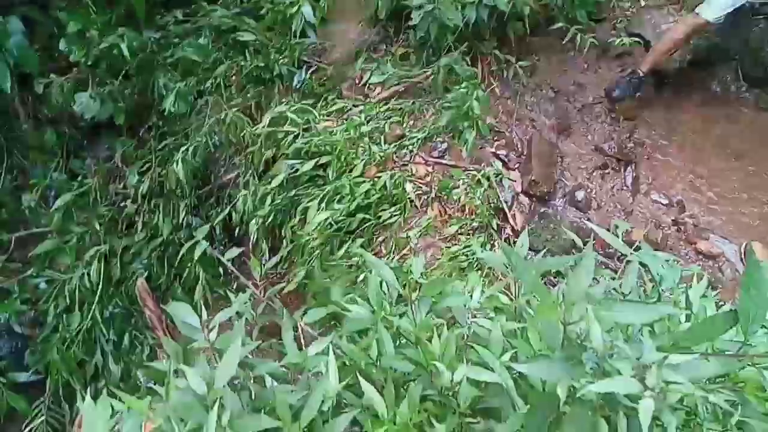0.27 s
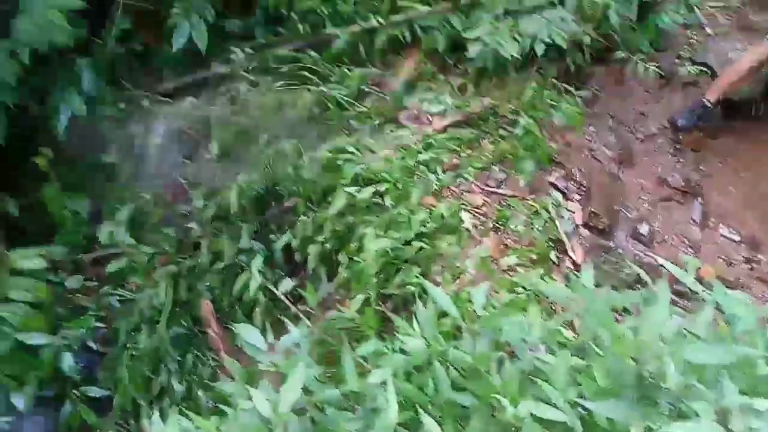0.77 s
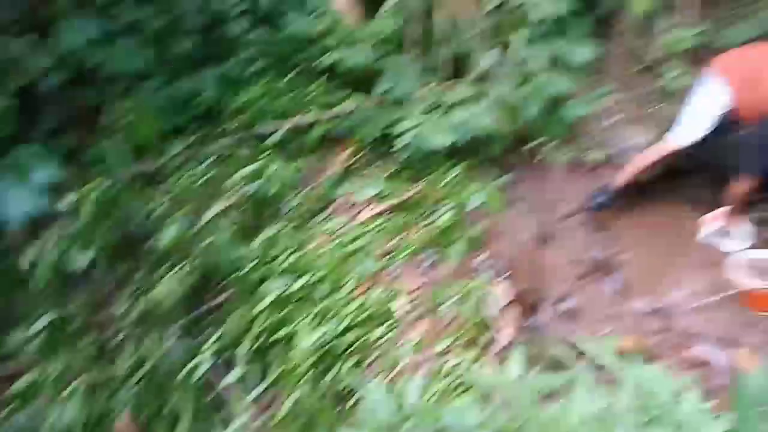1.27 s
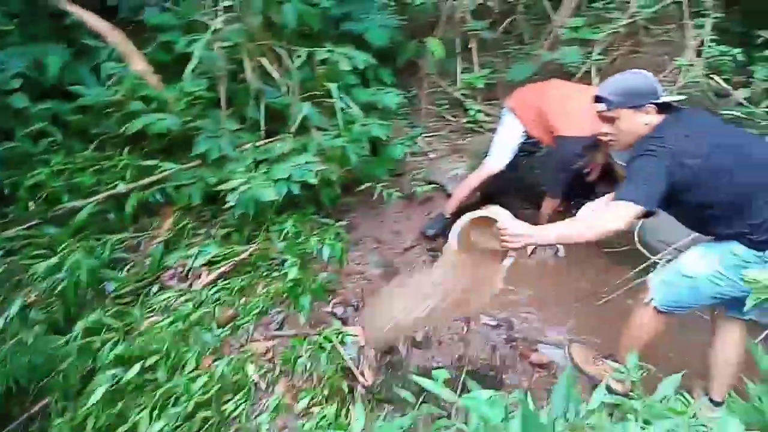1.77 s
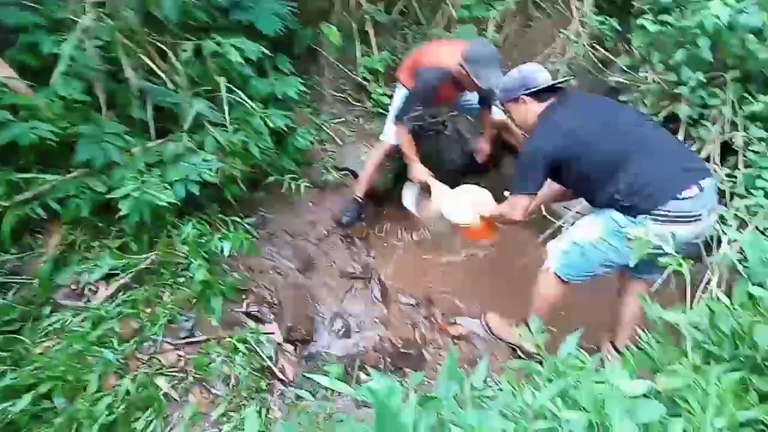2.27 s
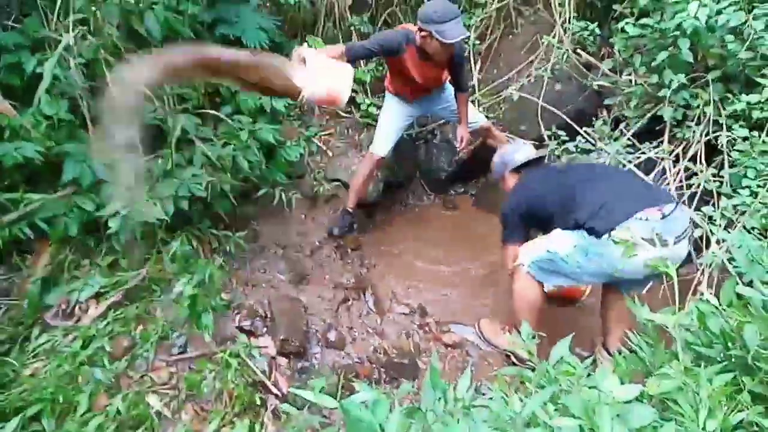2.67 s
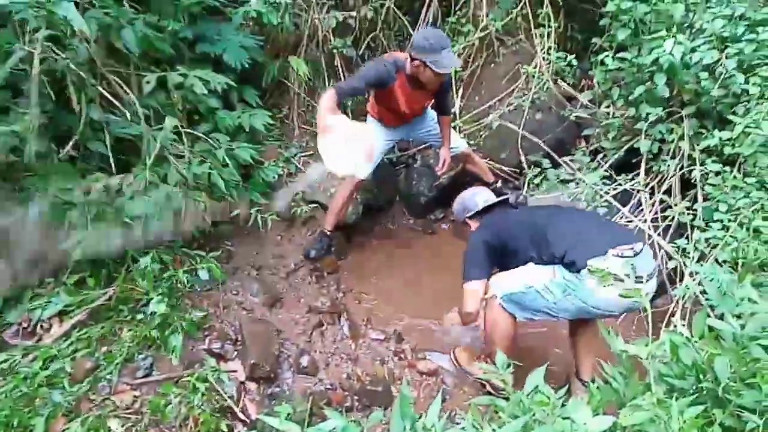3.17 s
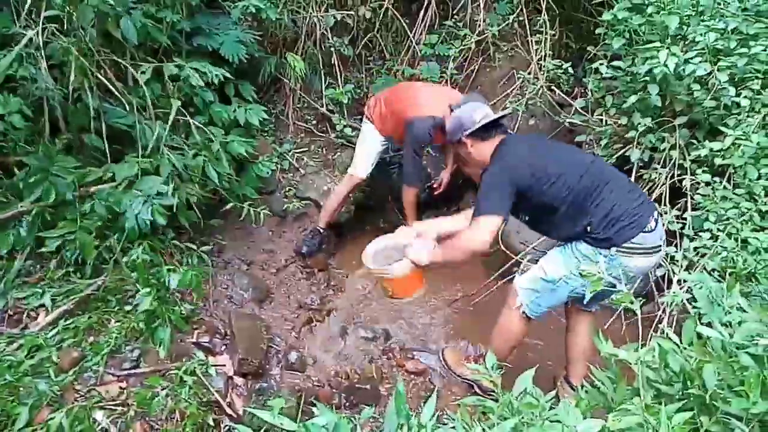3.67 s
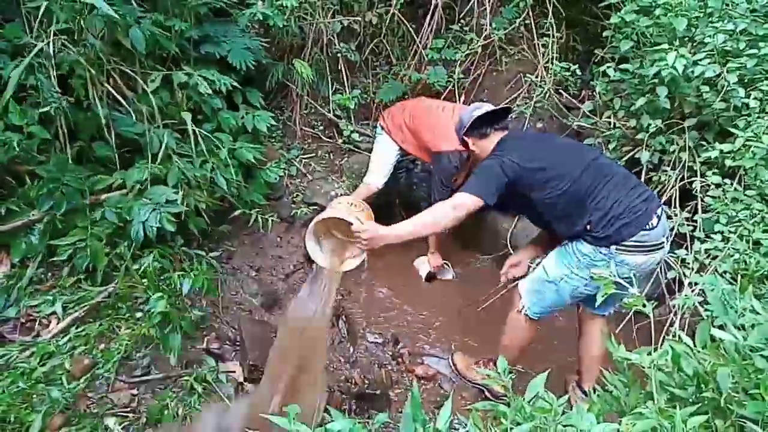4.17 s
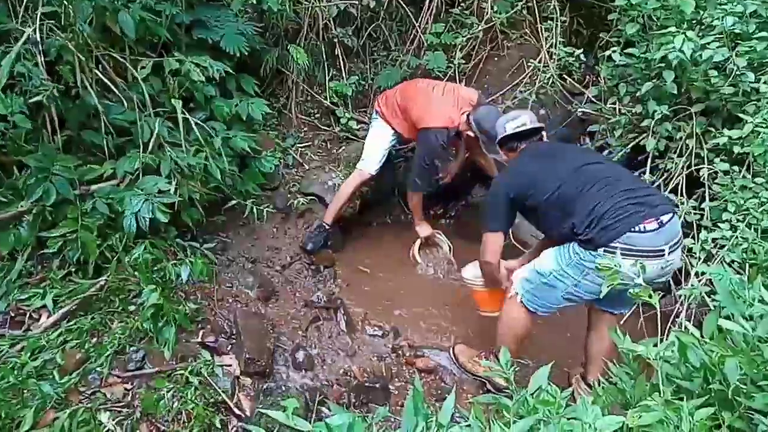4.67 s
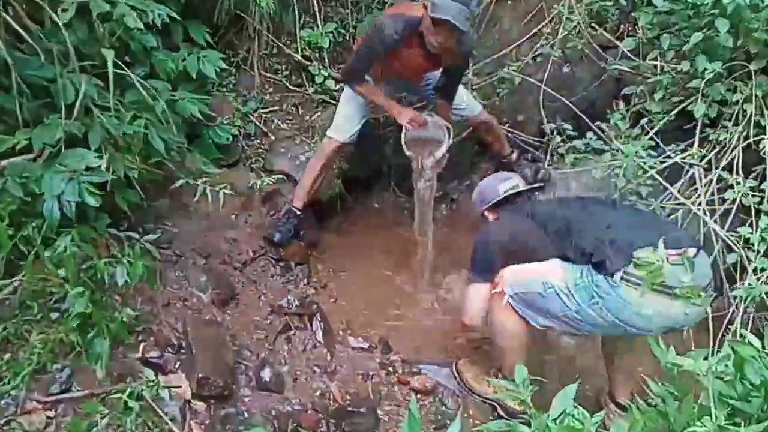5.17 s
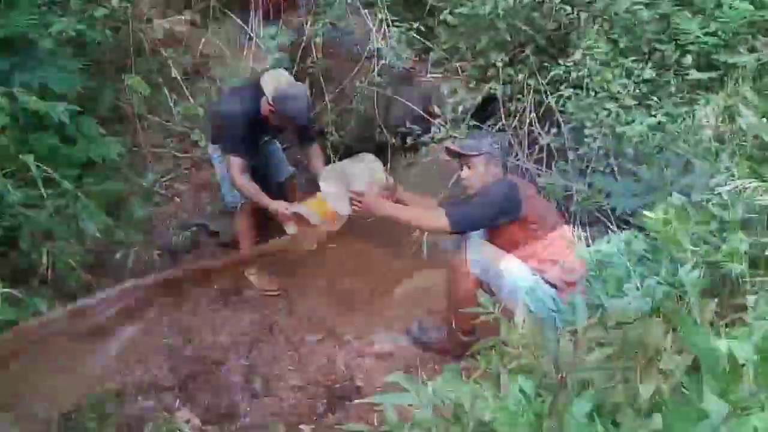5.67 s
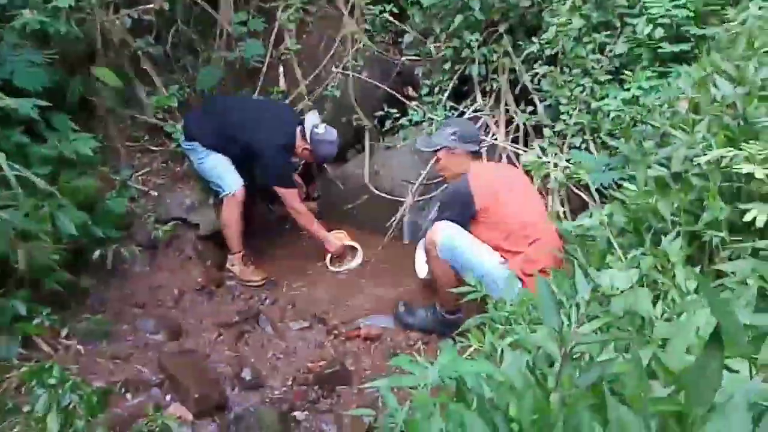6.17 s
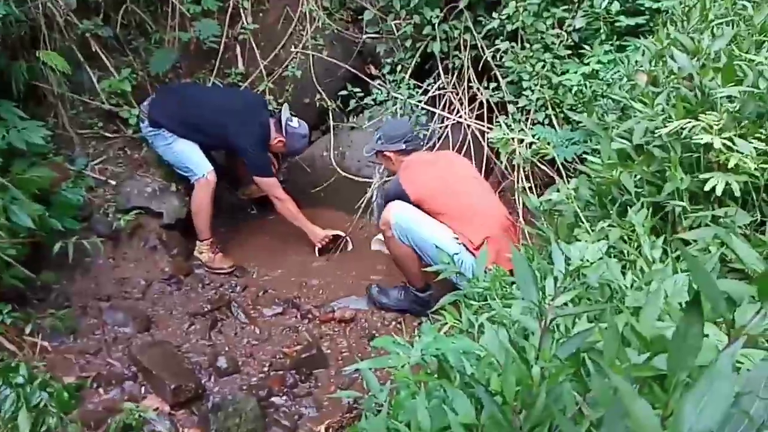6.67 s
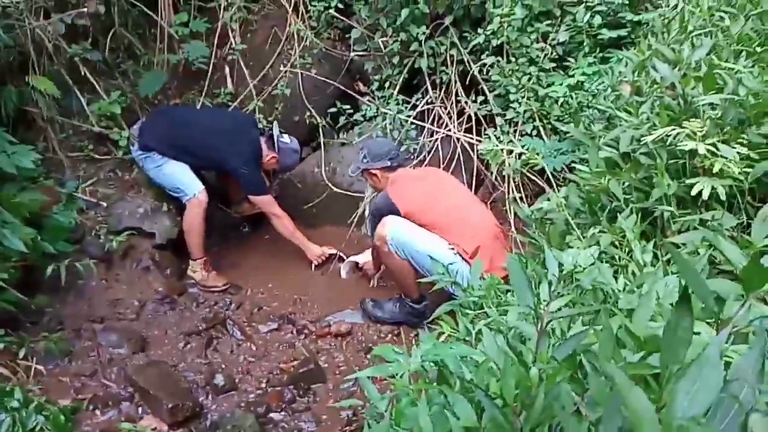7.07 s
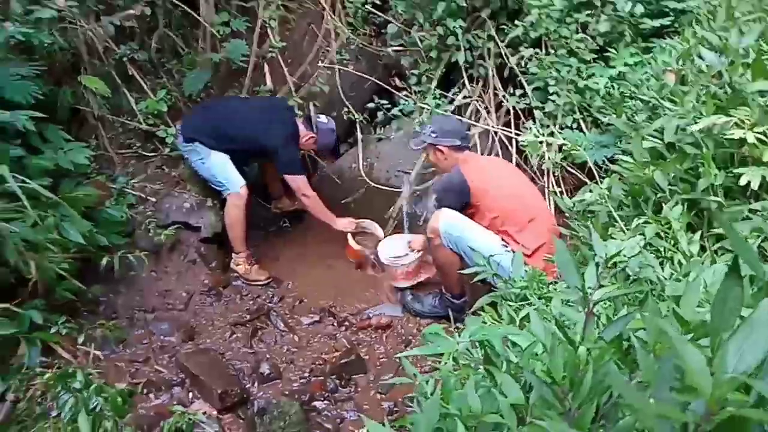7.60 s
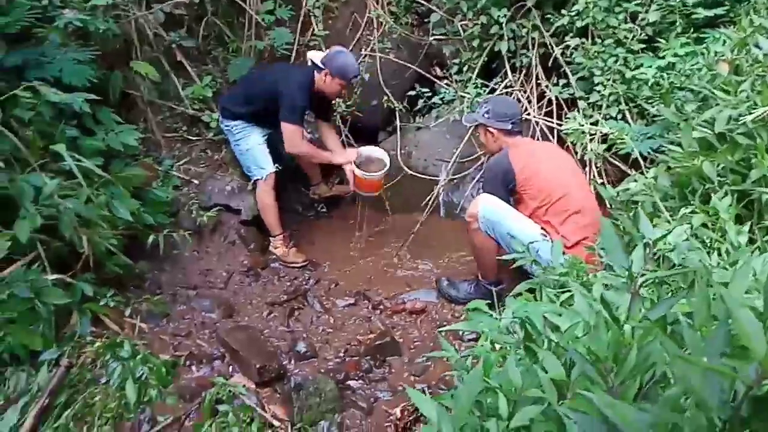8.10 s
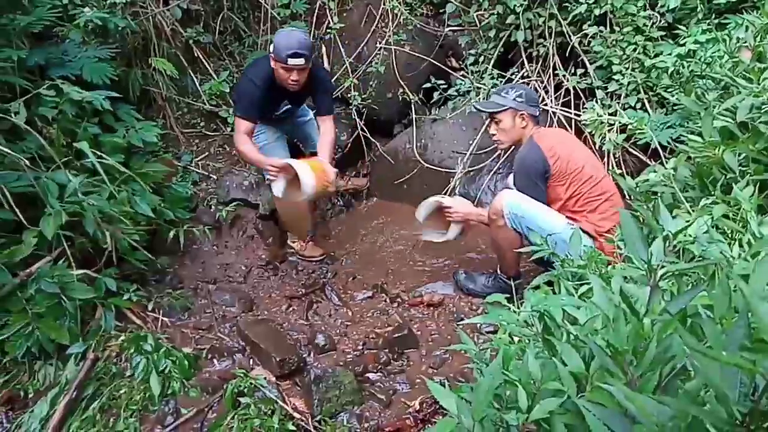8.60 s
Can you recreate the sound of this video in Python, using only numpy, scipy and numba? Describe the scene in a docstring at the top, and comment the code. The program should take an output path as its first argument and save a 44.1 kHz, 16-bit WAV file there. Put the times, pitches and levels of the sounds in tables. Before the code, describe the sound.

Outdoors at a shallow muddy pool, plastic buckets bail water over a faint, steady stream trickle. It opens with pattering spray and small bubbles; at 0.7-0.9 s a splash lands with a deep hollow glug and low thump. Lighter plops and drips follow, with a dull knock at 1.25 and another round glug at 1.4. At 2.2-2.3 s a hard scoop bursts out: slaps, knocks, churning bubbles and wide spray, its hollow slosh swelling until 2.5. Runoff settles, then a crisp splash at 3.3 and scattered drips and glugs. The loudest double hit comes at 4.4-4.55, thumping, splashing and slightly distorted, then dying away. Soft gurgles around 5.4 lead to a short sharp splash at 6.0. Afterwards scooping is gentle: low sloshing at 6.5-6.9, bubbly plops at 7.3, then tiny gurgles and quiet trickling to about 8.8. The sound is close, dry, thin in bass and faintly hissy.

```python
"""Bailing a muddy pool

Buckets bail a shallow pool among leafy banks, over a trickling stream.
Water lands as noise and click spray, with decaying noise bursts for slaps and low noise for thumps.
Moving resonances and rising tones make the glugs; ringing clicks make the bubbles; short pulses knock.
The microphone hisses faintly, loses deep bass and extreme treble, and clips the strongest peaks."""
import sys
import numpy as np
from scipy import signal
from scipy.fft import rfft, irfft
from scipy.io import wavfile
from numba import njit

SR = 44100
rng = np.random.default_rng(int(sys.argv[2]) if len(sys.argv) > 2 else 0)


def wav_out(sig):
    """Save sig, one row per channel (or a flat mono array), as 16-bit PCM at SR to the path in sys.argv[1]."""
    wavfile.write(sys.argv[1], SR, np.round(np.clip(np.atleast_2d(sig).T, -1, 1) * 32767).astype(np.int16))


N = 389844

# spectrum of hard throws: (frequency [Hz], relative density [dB per Hz])
THROW_SPECTRUM = [(530, -33), (900, -1), (1540, -7), (2090, -3.5), (2630, 0), (3660, 3.5), (3940, -2),
                  (4540, -10.5), (5430, -21.5), (7310, -16.5), (9720, -24.5), (13400, -25.5), (15500, -28)]
# spectrum of gentle scooping: (frequency [Hz], relative density [dB per Hz])
SCOOP_SPECTRUM = [(530, -35.5), (900, -6.5), (1300, -3.5), (1710, -10.5), (1880, 2), (2470, -5.5),
                  (2750, -5.5), (3580, -6), (5490, -30), (7220, -22.5), (9840, -40), (15500, -54.5)]
# gentle scooping against hard throws: (time [s], share [0-1])
SCOOP_SHARE = [(0, 0.41), (5.0, 0.078), (5.8, 0.97), (8.84, 1)]


def from_db(db):
    """Gain of a dB value."""
    return 10 ** (np.asarray(db) / 20)


def rms_one(x):
    """Scale to rms 1."""
    return x / np.sqrt(np.mean(x ** 2) + 1e-20)


def in_time(rows):
    """Columns of a curve table at every sample."""
    s, *columns = np.transpose(rows)
    return [np.interp(np.arange(N) / SR, s, c) for c in columns]


def drift(rate_hz):
    """Slow random curve of rms 1: noise through two equal poles, at 1/20 of the sample rate."""
    r = np.exp(-40 * np.pi * rate_hz / SR)
    noise = rng.standard_normal(N // 20 + 4002)
    slow = signal.lfilter([1], [1, -2 * r, r * r], noise)[4000:]  # drop the settling
    return np.interp(np.arange(N) / 20, np.arange(len(slow)), rms_one(slow))


def colour(x, spectrum, size=4096):
    """Causal (minimum-phase) filter that follows a dB spectrum."""
    hz, db = np.transpose(spectrum)
    grid_hz = np.maximum(np.fft.rfftfreq(size, 1 / SR), 1)
    log_gain = np.interp(np.log(grid_hz), np.log(hz), db) * np.log(10) / 20
    cepstrum = irfft(log_gain)
    # fold onto positive time
    cepstrum[1:size // 2] *= 2
    cepstrum[size // 2 + 1:] = 0
    impulse = irfft(np.exp(rfft(cepstrum)))
    return signal.oaconvolve(x, impulse)[:N]


def band(x, low_hz, high_hz):
    """Second-order Butterworth band-pass."""
    return signal.sosfilt(signal.butter(2, [low_hz, high_hz], "band", fs=SR, output="sos"), x)


def patchy(x, low_hz, high_hz, patch_db, rate_hz, count=7):
    """Split into bands that each waver on their own."""
    edges_hz = np.geomspace(low_hz, high_hz, count + 1)
    out = 0
    for low, high in zip(edges_hz, edges_hz[1:]):
        gain = from_db(patch_db * drift(rate_hz))
        sos = signal.butter(1, [low, high], "band", fs=SR, output="sos")
        out = out + gain * signal.sosfilt(sos, x)
    return out


def grains(per_s, spread_db, clump_db, clump_hz):
    """Clicks at random moments, of uneven size, coming in clumps."""
    size_db = spread_db * np.minimum(rng.exponential(1, N), 3.5)
    sizes = from_db(size_db) * rng.choice([-1, 1], N)
    chance = per_s * from_db(clump_db * drift(clump_hz)) / SR
    return sizes * (rng.random(N) < chance)


def add(out, s, sound):
    """Mix a short sound in at time s."""
    at = round(s * SR)
    out[at:at + len(sound)] += sound[:N - at]


def swells(peak_s, rise_s, fall_s, peak_db, rest_db):
    """Level in dB: each event climbs and falls in straight dB lines; powers add to the rest level."""
    t = np.arange(0, N + 32, 32) / SR
    late = t - np.c_[peak_s]
    # slopes in s per 20 dB, sign ignored
    shape_db = -20 * np.where(late < 0, -late / np.abs(np.c_[rise_s]), late / np.abs(np.c_[fall_s]))
    power = np.sum(from_db(2 * (np.c_[peak_db] + shape_db)), axis=0)
    return 10 * np.log10(np.interp(np.arange(N) / SR, t, power) + from_db(2 * rest_db))


@njit
def moving_resonance(x, cos_w, r):
    """Two-pole resonance whose centre moves sample by sample."""
    y = np.zeros(len(x))
    for i in range(2, len(x)):
        y[i] = x[i] - x[i - 2] + 2 * r * cos_w[i] * y[i - 1] - r * r * y[i - 2]
    return y


def bubbles(clicks, low_hz, high_hz, cycles, count=18):
    """Clicks dealt to bubbles of many sizes; each swells briefly, its ring losing 60 dB in some cycles."""
    dealt, rings = rng.integers(0, count, N), 0
    for k, hz in enumerate(np.geomspace(low_hz, high_hz, count)):
        r, w = from_db(-60 * hz / (cycles * SR)), 2 * np.pi * hz / SR
        soft = np.exp(-1.5 * hz / SR)  # faster poles soften the onset
        poles = np.convolve([1, -2 * r * np.cos(w), r * r], [1, -2 * soft * np.cos(w), soft * soft])
        hits = clicks * (dealt == k) + 1e-18
        rings = rings + signal.lfilter([np.sin(w) ** 2 * (1 - soft)], poles, hits)
    return rms_one(rings)


def stream(level_db=-49.5):
    """The stream trickles on behind: coloured noise, patchy band by band."""
    # stream spectrum: (frequency [Hz], relative density [dB per Hz])
    spectrum = [(18, -56), (30, -28), (53, -15), (262, 3), (708, -3.5), (2830, -1), (3870, -21),
                (5580, -36.5), (7250, -21), (9920, -29), (15500, -60)]
    noise = colour(rng.standard_normal(N), spectrum)
    trickle = patchy(noise, 40.0, 17400, patch_db=4.5, rate_hz=8, count=9)
    return from_db(level_db) * rms_one(trickle)


def rumble(rise_s_per_20db=0.13, rest_db=-65):
    """Weight of water landing on mud: swells of lumpy low noise."""
    # thumps: (peak time [s], level [dB], fall [s per 20 dB])
    thumps = [(0.29, -47.5, 1.3), (0.86, -35, 0.1), (1.28, -50.5, 2.5), (2.0, -49, 1), (2.2, -41.5, 0.4),
              (2.34, -35.5, 0.44), (2.75, -34.5, 0.1), (3.32, -39, -0.1), (4.44, -31, 0.25),
              (4.55, -31, 0.25), (5.56, -45, .2), (5.9, -46, .2), (6.02, -38.5, 0.5), (6.3, -46.5, -1.3),
              (6.72, -34, 0.7)]
    peak_s, peak_db, fall_s = np.transpose(thumps)
    level_db = swells(peak_s, [rise_s_per_20db], fall_s, peak_db, rest_db)
    low = band(rng.standard_normal(N) * from_db(0.87 * drift(36)), 86, 209)
    return from_db(level_db) * rms_one(low)


def slosh(width_hz=50, rest_db=-53):
    """Lumps of water excite the air space of a bucket: lumpy noise through a resonance of moving pitch."""
    # surges in a bucket: (peak time [s], rise [s per 20 dB], fall [s per 20 dB], level [dB],
    # air-cavity pitch [Hz])
    surges = [(0.16, -0.5, 1.4, -32.5, 300), (0.74, .15, .2, -28, 316), (0.85, 0.01, 0.07, -19.5, 296),
              (1.17, 0.2, 0.33, -32, 282), (1.34, 0, .12, -32, 300), (1.43, .04, .1, -31, 263),
              (1.55, 0, 0.1, -37, 300), (1.75, .06, 0.2, -38, 345), (1.9, .2, 0.16, -34, 360),
              (2.2, -0.06, .25, -19.5, 325), (2.45, 0.27, 0.02, -14, 384), (2.61, .03, 0.4, -29.5, 356),
              (2.77, .3, 0, -37, 380), (2.9, 0.5, -1.5, -38.5, 366), (3.04, -0.4, 0.9, -31.5, 333),
              (3.09, -0.2, .5, -28, 348), (3.3, 0, .3, -32, 312), (3.45, 0.5, 0, -36, 267),
              (3.51, 0.3, -0.7, -36, 191), (3.57, 0.2, -0.4, -34.5, 213), (3.66, .15, -0.06, -29, 236),
              (3.72, 0.5, -0.2, -34.5, 370), (3.81, -0.7, 0.5, -37.5, 330), (3.86, -0.3, .1, -35, 238),
              (4.02, -0.1, .3, -35, 290), (4.19, -0.4, .3, -39, 310), (4.36, 0.5, 1, -39, 345),
              (4.44, -0.2, .5, -23.5, 407), (4.58, -0.04, 0.16, -16, 338), (5.06, 0.5, 0.4, -37, 330),
              (5.41, 0.1, .08, -27.5, 405), (5.6, 0, 3.5, -42, 241), (6.31, 0.25, .1, -36.5, 292),
              (6.54, 0, .06, -32, 231), (6.62, 0.1, 0.3, -27.5, 300), (6.72, 0.2, .5, -26.5, 284),
              (6.9, 0.44, .4, -32, 318), (7.17, 0, 1, -40, 477), (7.31, 0.15, .1, -31.5, 370),
              (7.38, .03, 0, -32, 417), (7.575, 0.1, 0.08, -31, 310), (7.75, 0, 0, -39.5, 560),
              (7.936, 0.6, -0.7, -37, 530), (8.05, -0.3, 0.3, -40, 544), (8.34, -0.1, 0, -40, 543),
              (8.6, 0.5, -0.1, -39.5, 480), (8.78, .05, 4.5, -40.5, 384)]
    peak_s, rise_s, fall_s, peak_db, hz = np.transpose(surges)
    level_db = swells(peak_s, rise_s, fall_s, peak_db, rest_db)
    cavity_hz = np.interp(np.arange(N) / SR, peak_s, hz)
    lumps = rng.standard_normal(N) * from_db(2.76 * drift(25.5) + 1.44 * drift(7.9))
    cos_w = np.cos(2 * np.pi * cavity_hz / SR)
    hollow = moving_resonance(lumps, cos_w, np.exp(-np.pi * width_hz / SR))
    mix = 0.71 * rms_one(band(hollow, 92, 730)) + 0.43 * rms_one(band(lumps, 200, 710))
    return from_db(level_db) * mix


def churn(level_db):
    """Larger bubbles in the pool, over gurgling noise."""
    clicks = grains(per_s=400, spread_db=4.0, clump_db=3.5, clump_hz=15)
    rings = bubbles(clicks, 494.0, 1797, cycles=23.3)
    lumps = rng.standard_normal(N) * from_db(4.5 * drift(20) + 1.8 * drift(8.4))
    gurgle = band(band(lumps, 480, 1670), 320, 2400)
    return from_db(level_db) * (0.6 * rings + 0.4 * rms_one(gurgle))


def water_levels(bubble_haste=2.1):
    """Spray, mist and bubble levels [dB]: bursts on top of runoff, bubbles rising and falling faster."""
    # splashes and bubble bursts: (peak time [s], spray and mist rise [s per 20 dB],
    # their fall [s per 20 dB], spray level [dB], fine mist level [dB], bubble level [dB])
    bursts = [(0.19, -0.04, 0.32, -24, -51, -35), (0.3, .5, 0.13, -25, -53, -31),
              (0.7, 0, 0.57, -22, -36.5, -25.5), (0.83, .5, 0.23, -20, -36.5, -34),
              (1.5, 0.1, 0.22, -28.5, -50, -33), (1.58, 0.3, 0.06, -30, -55, -35),
              (1.75, -0.5, .2, -33.5, -55, -42), (1.85, -0.1, -0.5, -33, -60.5, -37),
              (2.12, .03, .04, -37, -57, -31.5), (2.201, 0.0441, 0.26, -12.5, -36.5, -13),
              (2.29, 0.21, 0.26, -15.5, -40.5, -13), (2.46, 0.1, .9, -23.5, -48, -28.5),
              (3.31, .2, 0.18, -16, -34.5, -22), (3.36, 0.14, 0.09, -17, -43, -22.5),
              (3.52, .15, 0.36, -27.5, -49, -31), (4.38, 0.08, -0.02, -25.5, -44, -48.5),
              (4.428, .025, 0.19, -9.5, -36, -12), (4.55, 0.1452, 0.05, -12, -40, -8.5),
              (4.62, .1, 0.49, -24.5, -47.5, -22), (4.75, 0.2, -0.2, -27, -56, -38),
              (5.442, 0.28, 0.05, -28, -57, -19.5), (6.029, 0.03, 0.1146, -15.5, -41, -14.5),
              (6.15, 0.1, 0.29, -24, -48, -33), (6.55, 0.5, -0.35, -31.5, -52.5, -37),
              (6.745, 0.23, 0.36, -33.5, -66, -25), (7.297, 0.07, 0.1, -44, -70, -22),
              (7.356, 0, 0.17, -38, -70, -19.5), (8.78, 2.4, 0.5, -38, -68, -35.5)]
    # water running off between: (time [s], spray level [dB], fine mist level [dB], bubble level [dB])
    runoff = [(0, -30.5, -53, -32), (0.55, -37, -55, -48), (1.0, -33, -58, -28.5), (1.4, -35.5, -54, -32.5),
              (1.7, -40.5, -54, -48), (2.03, -35, -54, -39.5), (2.5, -40.5, -55.5, -34.5),
              (2.85, -41, -60, -44), (3.15, -30.5, -52, -32), (3.85, -30.5, -49.5, -39),
              (4.05, -34, -56, -48), (4.25, -37, -52.5, -56), (4.4, -38.5, -52.5, -52),
              (4.9, -38, -64, -36), (5.37, -35, -57, -34), (5.96, -30.5, -49, -33.5),
              (6.5, -36.5, -62.5, -32.5), (7.4, -37, -63.5, -33.5), (8.5, -39.5, -65, -39.5),
              (8.84, -54, -70, -54)]
    peak_s, rise_s, fall_s, *peaks = np.transpose(bursts)
    return [swells(peak_s, rise_s / haste, fall_s / haste, peak_db, rest_db)
            for peak_db, rest_db, haste in zip(peaks, in_time(runoff), [1, 1, bubble_haste])]


def spray(level_db, mist_db, treble_edge_hz=5700):
    """Countless drops on leaves, mud and water, some trapping tiny bubbles; fine mist hisses above."""
    # hollow near 2 kHz in the patter: (time [s], depth [0-1])
    dip = [(0, 0.2), (2.1, 0.3), (2.2, 0.54), (3.4, 0), (3.6, 0.4), (4.3, 0.1), (4.4, 0.07), (8.84, 0.42)]
    (gentle,), (depth,) = in_time(SCOOP_SHARE), in_time(dip)

    drops = rms_one(grains(per_s=3000, spread_db=3.5, clump_db=4, clump_hz=40))
    tiny = grains(per_s=420, spread_db=4.0, clump_db=4, clump_hz=11)
    fizz = bubbles(tiny, 1490, 4230, cycles=29.0)
    ticks = rms_one(grains(per_s=55, spread_db=1.5, clump_db=4.5, clump_hz=5))
    rain = 0.55 * drops + 0.5 * rng.standard_normal(N) + 0.16 * ticks
    mist = rng.standard_normal(N) * from_db(2.1 * drift(50)) + 0.3 * drops + 0.37 * ticks

    def shaped(x, side):
        """One side of the treble edge, crossfading between throws and scooping."""
        edge = signal.butter(4, treble_edge_hz, side, fs=SR, output="sos")
        thrown = rms_one(signal.sosfilt(edge, colour(x, THROW_SPECTRUM)))
        scooped = rms_one(signal.sosfilt(edge, colour(x, SCOOP_SPECTRUM)))
        return (1 - gentle) * thrown + gentle * scooped

    body, treble = shaped(rain, "low"), shaped(mist, "high")
    patter = patchy(band(body, 870, 13600), 733, 6030, patch_db=3.5, rate_hz=21.7)
    body = rms_one(patter) + 0.38 * fizz
    body = body - depth * band(body, 1730, 2340)
    return from_db(level_db) * body + from_db(mist_db) * treble


def knocks():
    """Dull knocks of a bucket on the bed: one short push and rebound each."""
    # knocks: (time [s], peak [dB], contact time constant [s])
    hits = [(1.254, -11, 0.00059), (2.198, -2, 0.00044), (2.309, -5.5, 0.00062), (2.657, -16, 0.00037),
            (4.427, -2.5, 0.00045), (4.547, 1, 0.00031), (6.531, -20, 0.00035), (7.294, -16.5, 0.00042),
            (7.351, -24, 0.0004)]
    out = np.zeros(N)
    for s, peak_db, contact_s in hits:
        t = np.arange(1500) / SR / contact_s
        push = t * np.exp(-t) * (1 - t / 2)
        add(out, s, from_db(peak_db) * push / push.max())
    return out


def pockets(swell_cycles=0.68, rise_per_s=1.32, rise_ref_hz=300, rise_power=.5):
    """A trapped air pocket swells into a tone, then dies while its pitch rises, small ones faster."""
    # pockets closing, deep in the buckets, higher in the pool:
    # (time [s], peak [dB], starting pitch [Hz], t60 [s])
    closings = [(.156, -27, 203, .08), (.042, -25, 962, 0.036), (.095, -23.5, 885, .07),
                (.178, -23, 1910, .04), (.19, -18.5, 198, 0.027), (.227, -20.5, 1940, 0.078),
                (.339, -23, 1050, .05), (.743, -19, 220, 0.043), (.846, -1, 290, 0.053),
                (.928, -17, 352, .1), (1.111, -24.5, 685, 0.17), (1.16, -27, 258, 0.069),
                (1.279, -30, 686, .04), (1.326, -20.5, 302, 0.044), (1.355, -27, 200, .06),
                (1.416, -4.5, 253, 0.05), (1.487, -22.5, 880, .06), (1.493, -24, 290, .053),
                (1.525, -25, 1060, .05), (1.533, -15, 300, 0.081), (1.572, -17.5, 895, 0.017),
                (1.573, -22.5, 302, .04), (1.603, -23, 306, 0.073), (1.864, -16, 368, 0.07),
                (2.193, -16, 430, .055), (2.194, -12.5, 233, 0.044), (2.196, -8, 1120, .036),
                (2.272, -5, 380, .027), (2.306, -10.5, 570, 0.03), (2.346, -8.5, 376, 0.079),
                (2.35, -13, 1010, 0.019), (2.526, -19.5, 1090, .021), (2.896, -24, 382, 0.027),
                (2.901, -25, 1570, .03), (3.033, -26, 341, .16), (3.075, -17.5, 368, 0.17),
                (3.158, -23, 1060, 0.064), (3.267, -17, 1700, .05), (3.293, -20, 1620, .034),
                (3.327, -13, 1550, .042), (3.446, -21.5, 254, .08), (3.49, -27, 195, .08),
                (3.557, -25.5, 212, .16), (3.608, -18, 386, 0.076), (3.657, -20.5, 226, .11),
                (3.695, -26, 293, 0.064), (3.72, -29, 350, .05), (3.85, -21, 226, 0.058),
                (3.856, -23.5, 1470, 0.028), (4.0, -13.5, 293, 0.048), (4.037, -23, 288, .042),
                (4.095, -12, 294, .069), (4.223, -21.5, 295, 0.077), (4.425, -4, 377, 0.031),
                (4.544, -11, 420, 0.024), (4.545, -7, 906, 0.019), (4.759, -22, 580, .055),
                (5.05, -24.5, 313, 0.026), (5.122, -24.5, 610, .08), (5.258, -22, 257, 0.036),
                (5.34, -25.5, 730, 0.063), (5.38, -17, 332, .043), (5.415, -21.5, 772, 0.11),
                (5.7, -25, 1020, .033), (6.092, -21, 1140, .044), (6.142, -18, 1380, .1),
                (6.39, -21, 830, .032), (6.535, -23, 214, 0.037), (6.607, -28, 191, .11),
                (6.701, -20, 210, 0.045), (6.89, -21.5, 331, 0.064), (7.165, -28.5, 483, 0.066),
                (7.293, -16.5, 596, .04), (7.35, -12.5, 468, 0.066), (7.349, -10.5, 643, 0.042),
                (7.352, -16, 340, 0.051), (7.433, -27, 1130, 0.12), (7.498, -26, 1600, .05),
                (7.564, -23, 1260, .04), (7.564, -32, 297, .08), (7.672, -24.5, 1470, .036),
                (7.885, -26, 546, .06), (7.917, -26.5, 568, .05), (8.058, -30, 300, .05),
                (8.096, -26, 580, 0.053), (8.138, -25.5, 630, 0.034), (8.335, -26, 480, 0.036),
                (8.426, -26.5, 780, .043), (8.517, -26, 485, 0.039)]
    out = np.zeros(N)
    for s, peak_db, hz, t60_s in closings:
        t = np.arange(round(1.3 * abs(t60_s) * SR)) / SR
        shape = (1 - np.exp(-t * hz / swell_cycles)) ** 2 * from_db(-60 * t / abs(t60_s))
        rise = rise_per_s * (hz / rise_ref_hz) ** rise_power
        tone = np.sin(2 * np.pi * hz * t * (1 + rise * t))  # pitch is hz * (1 + 2 * rise * t)
        add(out, s, from_db(peak_db) * shape / shape.max() * tone)
    return out


def slaps(ring_share_db=-5.5, length=4000):
    """Each slap is a crack of broad spray noise and a ring: the same burst round its own centre."""
    # slaps and big drops: (time [s], ring peak before ring_share_db [dB], centre [Hz], t60 [s],
    # broad crack before colouring [dB])
    strikes = [(.13, -12, 2920, .022, -28), (.186, -7, 2130, .03, -27), (.731, -4, 3300, 0.034, -11),
               (.811, -7.5, 3560, 0.081, -10), (.991, -8, 3570, .035, -25),
               (1.1849, -15, 2970, .059, -16.5), (1.28, -12.5, 3500, 0.085, -27),
               (1.413, -15.5, 1520, .044, -19), (1.483, -6.5, 3370, .073, -15.5),
               (1.572, -5.5, 3600, .03, -28), (1.601, -12, 2920, .03, -21),
               (1.636, -13.5, 3300, 0.065, -22), (1.716, -13.5, 2960, 0.029, -27),
               (1.732, -11, 3460, 0.054, -32), (1.848, -7.5, 3600, 0.051, -30),
               (2.028, -19, 3620, .035, -27), (2.11, -14, 1310, .043, -28),
               (2.122, -13.5, 2870, 0.042, -30), (2.168, -4, 3040, 0.045, -20),
               (2.179, 0.5, 3960, 0.052, -17), (2.196, 0, 1780, 0.048, -2), (2.273, 1.5, 1340, .04, -17),
               (2.312, 0, 3380, .055, -19), (2.587, -11, 3480, 0.073, -20), (2.662, -12.5, 3560, .035, -17),
               (2.885, -17, 3870, .074, -20), (3.021, -12, 3450, .043, -37), (3.161, -15, 1680, .052, -26),
               (3.2648, -10, 1710, .035, -13), (3.294, -1, 2250, .06, -20), (3.327, -12, 1660, .042, -8),
               (3.416, -14, 2500, .028, -32), (3.641, -16, 3700, 0.079, -19.5),
               (3.766, -7, 3540, 0.026, -25), (3.788, -12.5, 2400, 0.049, -23),
               (3.8245, -13, 3680, 0.038, -16), (3.856, -9, 3640, .035, -25),
               (3.948, -10.5, 2930, 0.037, -20.5), (4.092, -15, 1260, .05, -18.5),
               (4.152, -14, 2350, .035, -19), (4.189, -17, 3050, 0.052, -19),
               (4.212, -15, 3120, 0.056, -22.5), (4.371, -17, 3720, 0.075, -22),
               (4.398, -17, 2570, 0.068, -16), (4.426, -2, 1600, .049, -7), (4.938, -19, 1760, .042, -39),
               (5.01, -11.5, 2630, .02, -36), (5.052, -14, 1700, 0.043, -29),
               (5.433, -12.5, 2120, 0.057, -31), (5.7, -20, 1480, .035, -24),
               (6.01, -8.5, 1510, 0.039, -4.5), (6.028, -0.5, 1990, .018, 0.5),
               (6.14, -8, 1470, .052, -18.5), (6.191, -13, 1620, .046, -25), (6.732, -10, 1230, 0.082, -29),
               (7.292, -17, 1310, 0.028, -35), (7.351, -18, 1470, .03, -31), (7.598, -15.5, 2600, .03, -20)]
    broad, tuned = np.zeros(N), np.zeros(N)
    noise = rng.standard_normal((len(strikes), length))
    noise[:, :3] = [2.0, 3.0, 2.0]  # first contact
    t = np.arange(length) / SR
    for (s, peak_db, hz, t60_s, crack_db), burst in zip(strikes, noise):
        burst = burst * from_db(-60 * t / abs(t60_s))
        add(broad, s, from_db(crack_db) * burst)
        ring = band(burst, hz / 1.14, hz * 1.126)
        add(tuned, s, from_db(peak_db + ring_share_db) * ring / np.abs(ring).max())
    gentle, = in_time(SCOOP_SHARE)
    crack = (1 - gentle) * colour(broad, THROW_SPECTRUM) + gentle * colour(broad, SCOOP_SPECTRUM)
    return crack + tuned


def banks(x):
    """A few dull echoes from rocks and banks."""
    out, dull = x.copy(), signal.lfilter([.3], [1, -.7], x)
    for lag_s, echo_db in [(.007, -32.5), (.017, -16), (.031, -18.5)]:
        add(out, lag_s, from_db(echo_db) * dull)
    return out


def scene():
    """All the water, one channel; only pockets, knocks and slaps echo."""
    spray_db, mist_db, bubble_db = water_levels()
    background = stream() + rumble() + slosh() + churn(bubble_db)
    events = banks(knocks() + pockets() + slaps())
    return (background + spray(spray_db, mist_db) + events)[None]


def record(dry, hiss_db=-76, bass_cut_hz=90, cutoff_hz=15650):
    """The microphone adds hiss, drops the deep bass and clips strong peaks; then the top is cut."""
    hissing = dry + from_db(hiss_db) * rng.standard_normal(dry.shape)
    thin = signal.sosfilt(signal.butter(2, bass_cut_hz, "high", fs=SR, output="sos"), hissing)
    clipped = np.clip(thin, -.92, .92)
    return signal.sosfilt(signal.ellip(12, .3, 70, cutoff_hz, fs=SR, output="sos"), clipped)


dry = scene()
out = record(dry)
wav_out(out)
```